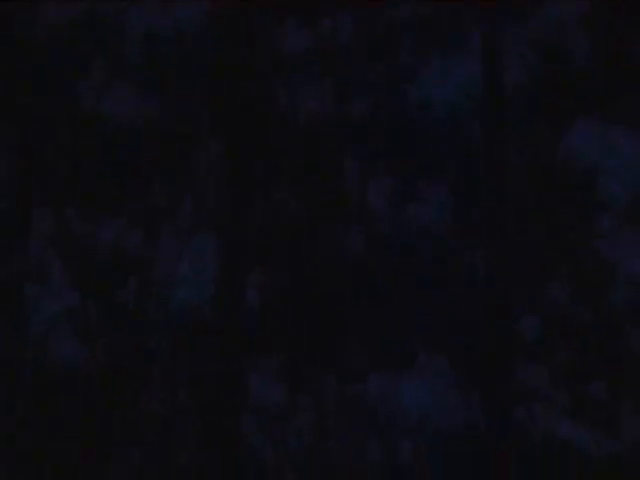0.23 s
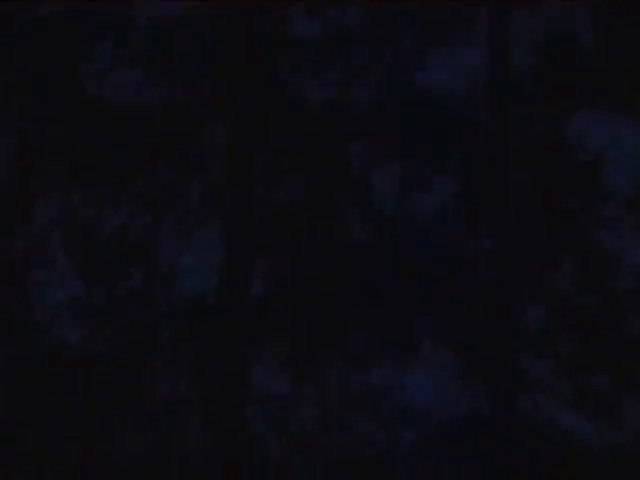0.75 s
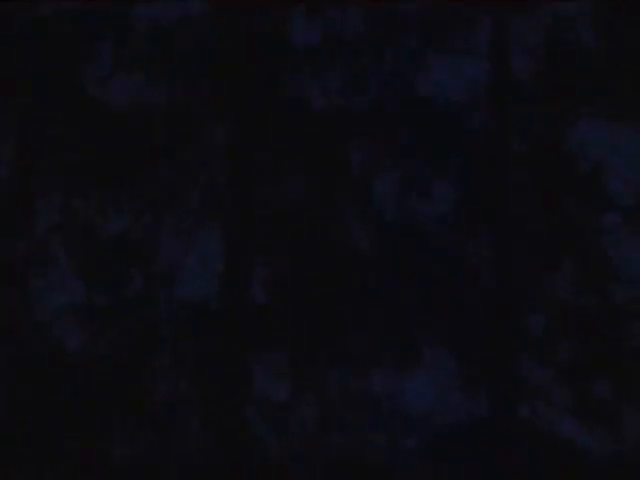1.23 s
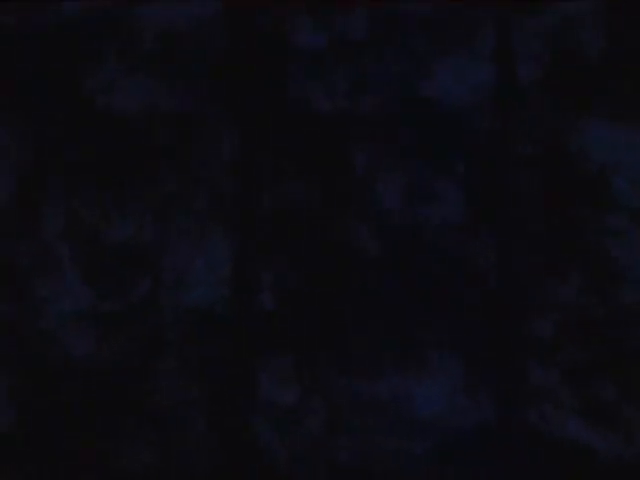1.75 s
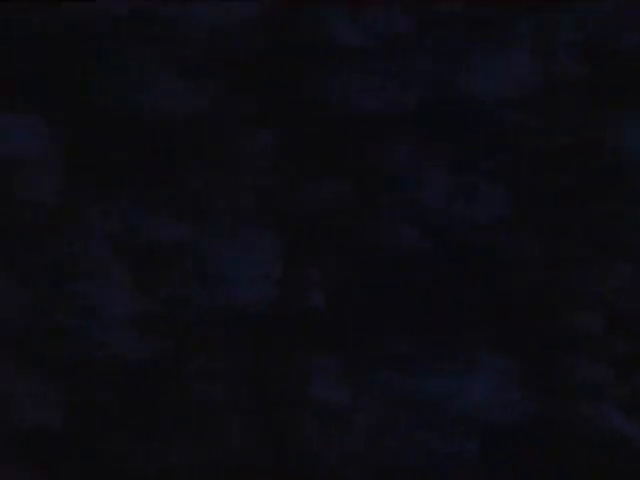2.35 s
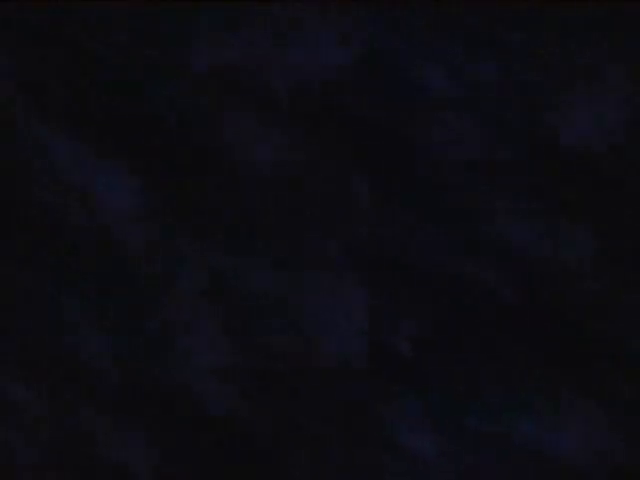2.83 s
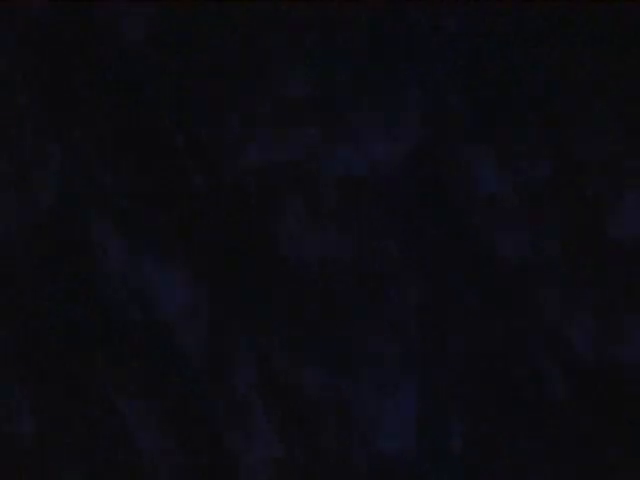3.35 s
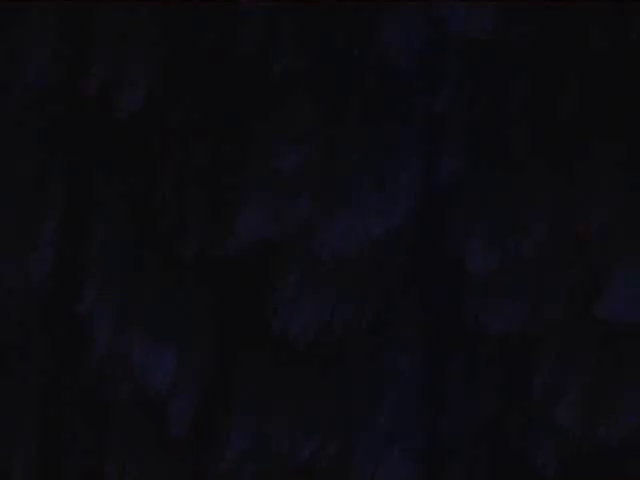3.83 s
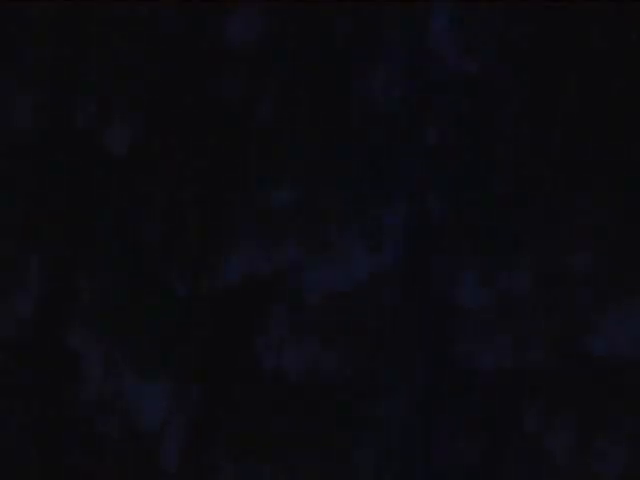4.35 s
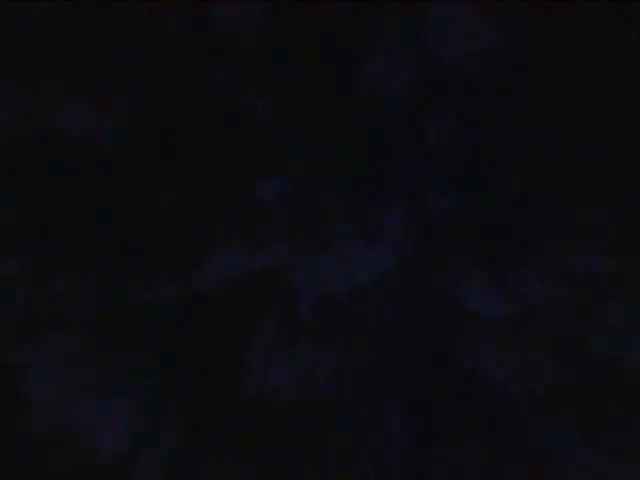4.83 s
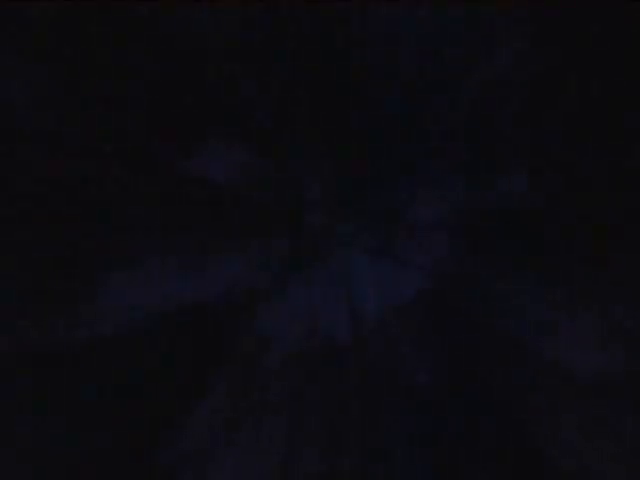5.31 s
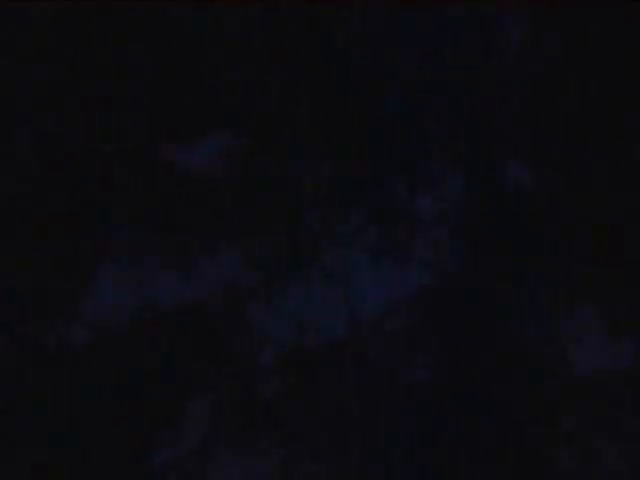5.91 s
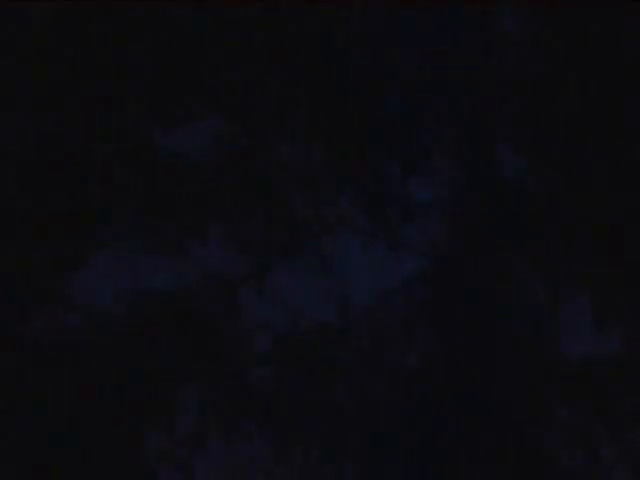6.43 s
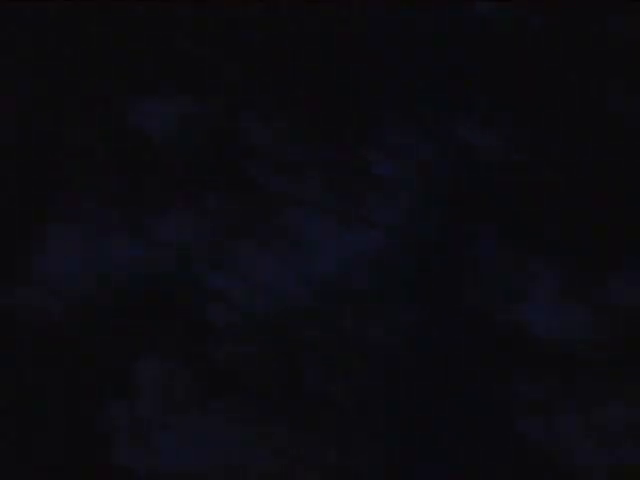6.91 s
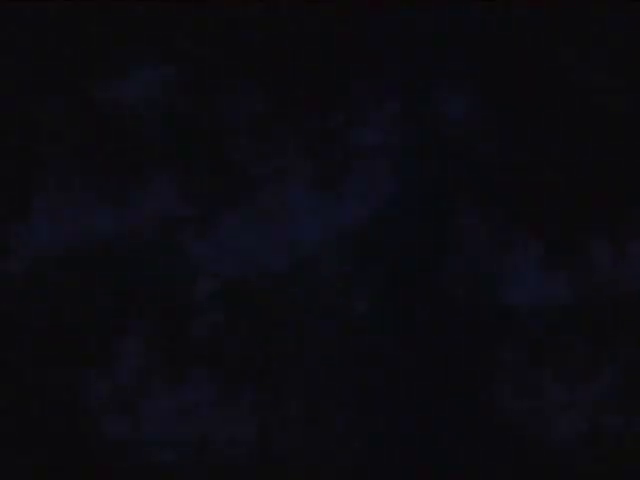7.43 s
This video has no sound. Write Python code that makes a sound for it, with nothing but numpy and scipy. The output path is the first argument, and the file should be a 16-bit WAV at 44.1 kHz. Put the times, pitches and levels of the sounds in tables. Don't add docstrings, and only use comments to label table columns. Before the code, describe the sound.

Three brief owl yelps, each dipping low then snapping higher, ring shortly among trees above quiet far traffic, faint hum and scattered tiny clicks.

```python
import sys
import numpy as np
from scipy import signal
from scipy.io import wavfile
from scipy.ndimage import uniform_filter1d

SR = 44100
rng = np.random.default_rng(int(sys.argv[2]) if len(sys.argv) > 2 else 0)


def gain_from_db(level_db):
    decades = np.asarray(level_db, float) / 20
    return 10 ** decades


def log_audio(samples):
    frames = np.atleast_2d(samples).T
    limited = np.clip(frames, -1, 1)
    pcm = np.round(limited * 32767).astype(np.int16)
    wavfile.write(sys.argv[1], SR, pcm)


N = 338247

# start_s, break_s, valley_hz, hook_height (share of the usual opening rise), level_db
LOW_NOTES = [
    (.117, .293, 1067, 1.07, -42.5),
    (3.621, 3.798, 1070, 1.27, -42.5),
    (6.755, 6.936, 1129, .8, -42),
]
# place (share of note), above_valley_hz, effort_db, brightness_db per harmonic
LOW_NOTE_SHAPE = [(0, 97.5, -3, 2), (0.071, 175.5, -2.5, 0), (.2, 116, -4, -0.1), (0.359, 39.5, -6.5, -2),
                  (.53, 1.5, -5.5, 0.5), (.68, 33, -3.5, -0.1), (.86, 132.5, 3, -0.3),
                  (.93, 143.5, 3.5, 0.9), (1, 282, 4.5, 6)]
# time_s, pitch_hz, effort_db, brightness_db per harmonic
HIGH_NOTES = [
    [(.295, 1530, -29, 5.5), (.315, 1605, -35.5, 7), (.333, 1632, -29.5, 5), (.348, 1624, -40, 13),
     (.359, 1589, -29.5, -2), (.37, 1565, -26.5, -1.5), (.381, 1475, -38, 8), (.393, 1360, -36, 8)],
    [(3.8, 1568, -41, 5), (3.815, 1624, -28, -7.5), (3.836, 1653, -34.5, -2), (3.85, 1604, -29, -13),
     (3.86, 1604, -39, 2), (3.878, 1538, -31.5, -5.5), (3.886, 1460, -36, 5), (3.894, 1330, -44, -1)],
    [(6.938, 1620, -33, 1), (6.953, 1652, -32, 0.5), (6.966, 1623, -35, -1.5), (6.969, 1515, -29, -1.5),
     (6.982, 1504, -35, 6.5), (6.998, 1493, -32.5, 3.5), (7.013, 1464, -35.5, 1), (7.034, 1313, -47, 0)],
]
# first_db, third_db, fourth_db
LOW_COLOURS = [(-12, -3, -10.5), (-7, 0, -10), (-5.5, -3, -9)]
# first_db, third_db, fourth_db
HIGH_COLOURS = [(-7, -14, -21.5), (-11, -5, -16), (-13, -3, -13)]
# pitch_hz, level_db against the 4th
THROAT = [(5300, -4.5), (6400, -4.5), (7200, -11), (8000, -23), (11000, -21.5), (16000, -23)]
# multiple (of pitch), level_db against the 2nd harmonic
HALF_LINES = [(1.5, -18), (2.5, -11), (3.5, -36)]
STRAIN_DB = [-15, -16, -7]
EDGE_DULL_DB, EDGE_S = 20, 0.0045
FLUTTER_DB, FLUTTER_PER_S = 2, 18
# pitch_hz, width_hz, change_db
PATH_COLOUR = [
    [(1150, 150, 3), (1600, 30, -8), (3240, 100, -6), (3950, 200, -4), (6540, 200, -10)],
    [(1645, 90, 9), (3420, 80, -6), (4950, 200, -6), (6000, 300, -6)],
]
OWL_PAN_DB = [-4, -4.5, -5]
# delay_s, level_db
SCATTER = [(.004, -3.5), (.03, -12), (.08, -21), (.15, -29), (.25, -40), (.4, -51), (.6, -64)]
# low_hz, high_hz, decay_speed (factor)
FADING = [(910, 2240, 1.12), (2410, 4090, 1.01), (4460, 21000, 1.18)]
# pitch_hz, width_hz, added_share
TRUNK_GAPS = [
    [(1653, 27, 1.5), (3280, 25, 2), (3240, 220, -0.15)],
    [(1640, 58, 1.1), (3060, 100, -0.3), (4520, 100, 0.1), (6000, 65, 0.5)],
]

# time_s, peak_db, low_hz, high_hz, decay_ms
TICKS = [(.775, -51, 3500, 5500, 3), (.924, -44.5, 1510, 5500, 2), (1.690, -48, 1800, 6500, 3),
         (3.543, -50, 2820, 5770, 3), (3.998, -44.5, 2006, 7000, 2.5), (4.054, -49.5, 4360, 6500, 3),
         (4.471, -60, 4200, 4700, 2.9), (4.646, -40.5, 1130, 2800, 3.2), (4.646, -48, 2800, 5400, 3),
         (4.73, -57, 4800, 5300, 4), (4.855, -61, 4800, 5300, 4), (5.035, -54, 4400, 5360, 5.5),
         (5.115, -55, 4700, 5260, 3), (5.278, -56, 4750, 5300, 4), (5.502, -45, 1300, 1910, 5),
         (5.512, -57, 1600, 2100, 4), (5.521, -40, 1900, 2300, 3.1), (5.5215, -53, 3000, 6500, 1.5),
         (5.569, -60, 4700, 5600, 2.5)]
# time_s, whine_hz, whine_db, lower_gears_db (nearness)
VEHICLE = [
    (0, 2596, -76, -1),
    (.9, 2580, -78, -29),
    (1.6, 2620, -79, -11),
    (2, 2663, -77, -2),
    (3.5, 2713, -76.5, 4),
    (4.3, 2766, -74, 8),
    (6.2, 2774, -73, 10.5),
    (7.67, 2790, -73.5, 11.5),
]
# pitch (share of the whine), level_db
GEARS = [(.501, -83), (0.515, -89), (0.6387, -83), (0.667, -90), (.7505, -84), (.827, -89)]
# time_s, pitch_hz, level_db
TYRES = [
    (2.86, 1400, -92),
    (2.92, 1600, -59),
    (3.0, 2110, -60),
    (3.06, 2250, -90),
]
# pitch_hz, width_hz, level_db
HUM = [(103, 6.4, -62.5), (200, 22, -67.5)]

# pitch_hz, level_db per Hz
NIGHT = [(13, -55), (22, -78), (41, -7.5), (70, -8.5), (105, -1), (154, -8), (192, -8), (253, -8),
         (475, -9.5), (944, -6.5), (1500, -20.5), (2470, -19.5), (2750, -23), (3330, -24.5), (15500, -34)]
NIGHT_DB = -52
# time_s, swell_db
TRAFFIC = [(0, 3.5), (1, 3.5), (1.8, 3), (2.3, 4.5), (2.9, 5), (3.5, 3), (4.5, 4.5), (5.5, 4), (6.5, 2.5),
           (7.67, 3)]
# pitch_hz, likeness of left and right (0 to 1)
LIKENESS = [(25, 0.5), (60, 0.99), (150, 0.83), (380, 0.63), (950, 0.54), (2380, 0.023), (5980, 0.17),
            (15000, 0.55)]
# pitch_hz, left_minus_right_db
LEAN = [(60, -2), (240, -2.5), (950, -2.5), (3770, 0), (15000, 0.0)]

CLOCK_HZ, INPUT_CUTOFF_HZ = 3899, 15450
CLOCK_LEAK_DB = [-22.5, -30.5, -32, -33, -42]


def owl():
    calls = []
    for i in range(3):
        colours = LOW_COLOURS[i], HIGH_COLOURS[i]
        calls.append(call(LOW_NOTES[i], HIGH_NOTES[i], colours, PATH_COLOUR[i // 2], STRAIN_DB[i]))
    scattered = trees(calls[0] + calls[1], TRUNK_GAPS[0]) + trees(calls[2], TRUNK_GAPS[1])
    direct = sum(panned(c, pan_db) for c, pan_db in zip(calls, OWL_PAN_DB))
    return direct + panned(scattered, -2.0)


def call(low_note, high_note, colours, path_colour, split_db):
    t, pitch, effort_db, bright_db, high = contour(low_note, high_note)
    start = round(t[0] * SR)
    jitter = 0.0012 * drift(146, count=len(t))
    pitch = uniform_filter1d(pitch, size=100) * (1 + jitter)
    phase = 2 * np.pi * np.cumsum(pitch) / SR

    first, third, fourth = (effort_db + a + (b - a) * high for a, b in zip(*colours))
    lines = [(1, first - bright_db), (2, effort_db), (3, third + bright_db), (4, fourth)]
    lines += [(k, fourth + at_hz(THROAT, k * pitch)) for k in range(5, 11)]
    strain_db = split_db - 18.0 * np.clip((1450 - pitch) / 200, 0, 1)
    lines += [(k, effort_db + db + strain_db) for k, db in HALF_LINES]

    from_edge_s = np.minimum(t - t[0], t[-1] - t)
    edge = np.exp(-from_edge_s / EDGE_S)
    voice = 0
    for k, db in lines:
        line_hz = k * pitch
        db = db - EDGE_DULL_DB * np.clip(k - 2, 0, 2) * edge
        db = db + FLUTTER_DB * drift(FLUTTER_PER_S, count=len(t))
        for hz, width_hz, change_db in path_colour:
            db = db + change_db * np.exp(-((line_hz - hz) / width_hz) ** 2)
        tone = np.sqrt(2) * np.sin(k * phase + rng.uniform(0, 2 * np.pi))
        voice = voice + gain_from_db(db) * tone * (line_hz < 15600)

    breath = resonance(rng.standard_normal(len(t)), hz=3320, width_hz=3600) * (1 + np.sin(phase))
    voice += gain_from_db(effort_db - 25) * rms_one(breath)
    out = np.zeros(N)
    out[start:start + len(t)] = voice * np.clip(from_edge_s / 0.0014, 0, 1)
    return out


def contour(low_note, high_note):
    start, stop, valley_hz, hook, level_db = low_note
    t = np.arange(round(start * SR), round(high_note[-1][0] * SR)) / SR
    share, rise_hz, effort_db, bright_db = np.transpose(LOW_NOTE_SHAPE)
    before_valley = share < share[np.argmin(rise_hz)]
    rise_hz = rise_hz * np.where(before_valley, hook, 1)
    low_s = start + share * (stop - start)
    low = np.transpose([low_s, valley_hz + rise_hz, level_db + effort_db, bright_db])
    pitch, effort_db, bright_db = in_time(np.vstack([low, high_note]), t)
    smooth = uniform_filter1d(pitch, size=350, mode="nearest")
    pitch = np.where(t < low[-3, 0], smooth, pitch)
    high = np.interp(t, [stop, high_note[0][0]], [0, 1])
    return t, pitch, effort_db, bright_db, high


def trees(x, favoured):
    lag = np.arange(round(SCATTER[-1][0] * SR)) / SR
    white = rng.standard_normal((2, len(lag)))
    white[1] = 0.76 * white[0] + 0.62 * white[1]
    white += sum(share * resonance(white, hz, width_hz) for hz, width_hz, share in favoured)
    spray = 0
    for low_hz, high_hz, speed in FADING:
        decay_db = in_time(SCATTER, lag * speed)[0] - 24.5
        spray = spray + band(white, low_hz, high_hz) * gain_from_db(decay_db) * (lag > .004)
    return signal.fftconvolve(x[None], spray, axes=1)[:, :N]


def ticks():
    out = np.zeros(N)
    fade_ms = np.arange(900) * 1000 / SR
    for s, peak_db, low_hz, high_hz, decay_ms in TICKS:
        crackle = rng.standard_normal(len(fade_ms)) * np.exp(-fade_ms / decay_ms)
        tick = band(crackle, low_hz, high_hz)
        at = round(s * SR)
        out[at:at + len(tick)] += gain_from_db(peak_db) * tick / np.abs(tick).max()
    return out


def vehicle(t):
    whine_hz, whine_db, near_db = in_time(VEHICLE, t)
    turn = 2 * np.pi * np.cumsum(whine_hz * (1 + 0.00069 * drift(6.1))) / SR
    throb = 1 + .6 * np.cos(turn / 73)
    blur = gain_from_db(-23.0 - 0.74 * near_db) * drift(90)
    out = gain_from_db(whine_db + 2.0) * np.sin(turn) * (throb + blur)
    for share, db in GEARS:
        out += gain_from_db(db + near_db + 0.79 * drift(3.4)) * np.sin(share * turn)
    return np.sqrt(2) * out


def tyre_swish(t):
    hz, db = in_time(TYRES, t)
    return gain_from_db(db) * drift(160) * np.sin(2 * np.pi * np.cumsum(hz) / SR)


def hum():
    out = 0
    for hz, width_hz, db in HUM:
        once = resonance(rng.standard_normal(N), hz, width_hz)
        out = out + gain_from_db(db) * rms_one(resonance(once, hz, width_hz))
    return out


def night(t):
    edges = 22 * 2 ** np.arange(0, 9.7, 1 / 3)
    white = rng.standard_normal((2, 2, N))
    swell_db = in_time(TRAFFIC, t)[0]
    out = 0
    for k, (low, high) in enumerate(zip(edges, edges[1:])):
        mid, side = band(white[k % 2], low, high)
        hz = np.sqrt(low * high)
        alike = np.clip(at_hz(LIKENESS, hz), 0, 1)
        pair = np.sqrt(1 + alike) * mid + np.sqrt(1 - alike) * side * [[1], [-1]]
        road = np.exp(-(np.log(hz / 1500) / 0.53) ** 2)
        out = out + panned(pair, at_hz(LEAN, hz)) * gain_from_db(at_hz(NIGHT, hz) + road * swell_db)
    return gain_from_db(NIGHT_DB + 1.31) * rms_one(out)


def rms_one(x):
    return x / np.sqrt(np.mean(x ** 2) + 1e-20)


def in_time(rows, t):
    s, *columns = np.transpose(rows)
    return [np.interp(t, s, c) for c in columns]


def at_hz(points, hz):
    table_hz, values = np.transpose(points)
    return np.interp(np.log(hz), np.log(table_hz), values)


def drift(rate, count=N):
    r = np.exp(-2 * np.pi * rate / SR)
    wander = signal.lfilter([1], [1, -2 * r, r * r], rng.standard_normal(count + SR))
    return rms_one(wander[SR:])


def resonance(x, hz, width_hz):
    r = np.exp(-np.pi * width_hz / SR)
    zeros = np.array([1, 0, -1]) * (1 - r * r) / 2
    return signal.lfilter(zeros, [1, -2 * r * np.cos(2 * np.pi * hz / SR), r * r], x)


def band(x, low_hz, high_hz):
    return signal.sosfilt(signal.butter(2, [low_hz, high_hz], "band", fs=SR, output="sos"), x)


def panned(x, pan_db):
    return x * gain_from_db(np.array([[pan_db / 2], [-pan_db / 2]]))


def scene():
    t = np.arange(N) / SR
    far_things = ticks() + vehicle(t) + tyre_swish(t) + hum()
    return owl() + panned(far_things, -4.0) + night(t)


def low_pass(x):
    return signal.sosfilt(signal.butter(12, 15680, fs=SR, output="sos"), x)


def record(dry):
    clock = 2 * np.pi * CLOCK_HZ * np.arange(N) / SR
    loudness = np.tanh(uniform_filter1d(np.abs(dry), size=300) / 0.0059)
    leak = sum(2 * gain_from_db(db) * np.cos(k * clock) for k, db in enumerate(CLOCK_LEAK_DB, 1))
    rippled = dry * (1 + loudness * leak)
    steep_cut = signal.ellip(10, .5, 60, INPUT_CUTOFF_HZ, fs=SR, output="sos")
    return low_pass(signal.sosfilt(steep_cut, rippled))


dry = scene()
out = record(dry)
log_audio(out)
```